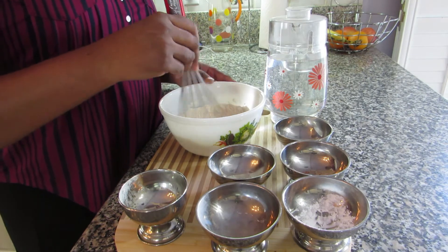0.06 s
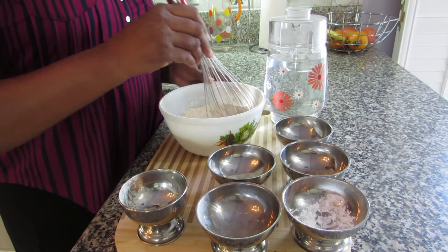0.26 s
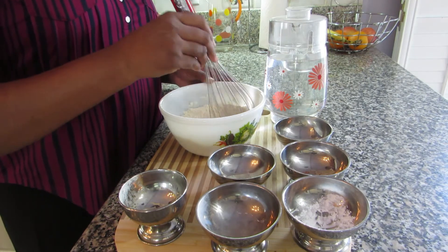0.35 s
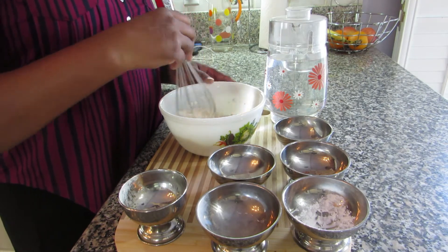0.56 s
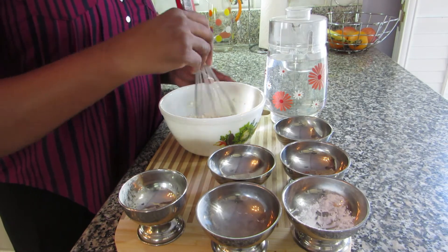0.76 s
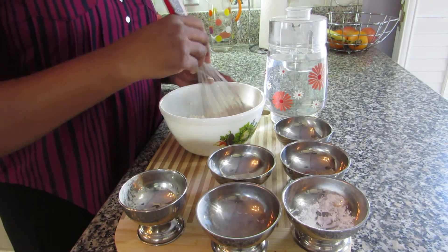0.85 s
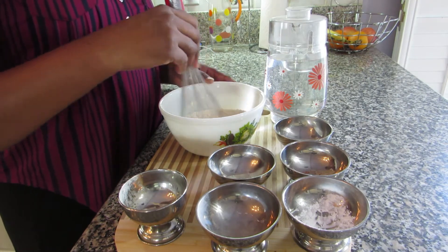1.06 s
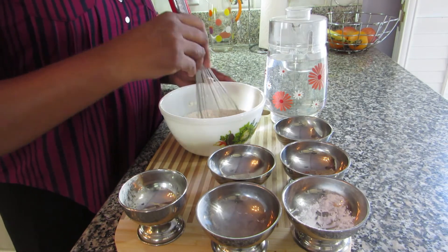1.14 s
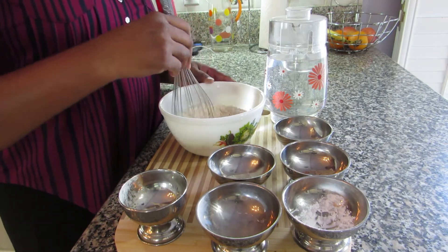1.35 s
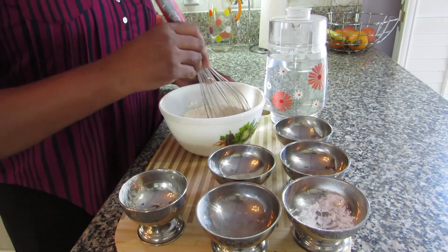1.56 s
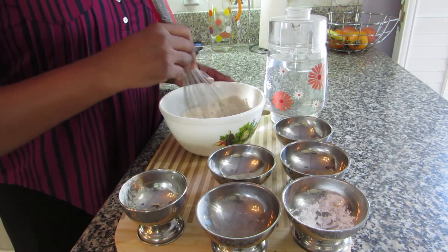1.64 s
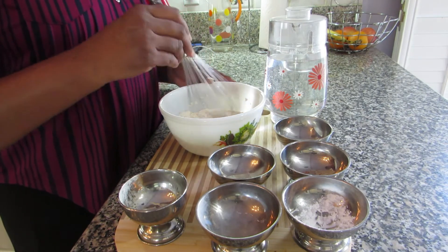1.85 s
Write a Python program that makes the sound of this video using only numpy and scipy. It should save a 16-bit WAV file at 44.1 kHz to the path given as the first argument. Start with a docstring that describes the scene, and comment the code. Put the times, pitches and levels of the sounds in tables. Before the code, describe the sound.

A wire whisk strikes a ceramic bowl with a bright clustered clink that rings briefly, then brushes through dry flour with light irregular ticks, close to a camera's stereo microphones in a hard-walled kitchen with low motor hum.

```python
"""Whisking flour in a ceramic bowl

A wire whisk stirs dry flour in a bowl on a wooden board, in a hard-walled kitchen, close to a camera's two
microphone ports. Wires clink on the bowl, which rings as decaying sines; short dull tones come from the board,
the counter and things nearby. The stroke through the flour is shaped noise with damped grains. A fridge-like
motor hums as steady sines over filtered room noise; decaying noise gives the walls' answer."""
import sys
import numpy as np
from scipy import signal
from scipy.fft import rfft, irfft, next_fast_len
from scipy.io import wavfile
from scipy.ndimage import map_coordinates

SR = 44100
rng = np.random.default_rng(int(sys.argv[2]) if len(sys.argv) > 2 else 0)


def int16_out(signal):
    """Quantize to a 16-bit WAV file."""
    q = np.round(np.clip(np.atleast_2d(signal).T, -1, 1) * 32767)
    wavfile.write(sys.argv[1], SR, q.astype(np.int16))


def magnitude_from_level(level_db):
    """Linear magnitude for a level in decibels (20 dB per decade)."""
    exponent = np.asarray(level_db, float) / 20
    return 10 ** exponent


N = 83790  # length in samples


def unit(x):
    """Scales a sound to rms 1."""
    return x / np.sqrt(np.mean(x ** 2) + 1e-20)


def along(points, hz):
    """Reads a curve of (Hz, value) points on a log frequency axis."""
    f, v = np.transpose(points)
    return np.interp(np.log(hz + 1), np.log(f + 1), v)


def wobble(rate):
    """A smooth random curve with rate knots a second."""
    knots = rng.standard_normal(int(N * rate / SR) + 4)
    return map_coordinates(knots, [np.arange(N) * rate / SR])


def filtered(x, response):
    """Multiplies the spectrum of x by a response of frequency in Hz."""
    m = next_fast_len(x.shape[-1] + 8192)
    spectrum = rfft(x, m) * response(np.fft.rfftfreq(m, 1 / SR))
    return irfft(spectrum, m)[..., :x.shape[-1]]


def ring(hz, db, t60, t, attack_s):
    """One mode: a sine that swells in quickly and dies by 60 dB in t60 seconds."""
    rise = 1 - np.exp(-t / attack_s)
    return magnitude_from_level(db - 60 * t / t60) * np.sin(2 * np.pi * hz * t) * rise


def add(track, s, sound):
    """Lays a sound into the track at s seconds."""
    track[round(s * SR):][:len(sound)] += sound


LINGER_DB, LINGER_LONGER = -21.5, 2.34  # weaker decay: level in dB, t60 as a multiple


def bell(hz, db, t60, t, attack_s):
    """A low bowl mode: a quick decay over a weaker part that the flour damps less, so it rings on."""
    quick = ring(hz, db, t60, t, attack_s)
    return quick + ring(hz, db + LINGER_DB, t60 * LINGER_LONGER, t, attack_s)


# Wires meeting the bowl close to the microphones. Each row: start in seconds, relative crack level in dB,
# then relative ring level in dB of each of the three lowest bowl modes, which depends on the spot struck.
CLINKS = [(0.237, -24.5, -28.5, -35, -36), (.243, -15, -18.5, -29, -33), (0.2459, -14.5, -34, -48, -53),
          (0.2507, -19.5, -40, -52, -42), (.256, -17.5, -46, -50, -60), (0.2647, -24, -58, -58, -54),
          (0.384, -41, -38, -44, -49), (0.495, -41, -44, -55, -58), (0.5713, -42, -46, -51, -51.5),
          (.626, -60, -60, -65, -66), (0.768, -43, -67, -55, -66), (0.837, -36, -51.5, -51, -58),
          (0.8432, -43, -62, -66, -63), (0.868, -34, -55, -67, -52), (0.878, -46, -65, -66, -65),
          (0.887, -35.5, -65, -70, -66), (.8926, -33.5, -67, -71, -64), (0.905, -57, -51.5, -62, -62),
          (0.9448, -38, -64, -73, -62), (.958, -44, -60, -66, -67), (1.0, -41, -64, -67, -62),
          (1.051, -41, -32.5, -59, -65), (1.072, -53, -67, -51, -67), (1.183, -51, -59, -63, -69),
          (1.256, -44, -65, -71, -73), (1.293, -34, -45, -67, -53), (1.306, -35, -68, -72, -64),
          (1.3918, -39, -56, -46, -55), (1.4024, -33, -45.5, -55, -38.5), (1.4125, -34.5, -46, -53, -44.5),
          (1.422, -40.5, -62, -51, -60), (1.5565, -36, -60, -42.5, -55), (1.5983, -29, -38, -44, -66),
          (1.6048, -31.5, -48, -60, -71), (1.8974, -23.5, -44, -42, -40)]
# The bowl's three main low modes, each a close pair.
# Each row: centre in Hz, split of the pair in Hz, t60 of the quick decay in seconds.
BOWL_LOW = [(1610, 4.8, .34), (2960, 14, .2), (4608, 3.5, .24)]
# Further bowl and wire modes, some close beside the low ones, all beating pairs.
# Each row: centre in Hz, level in dB relative to the contact, t60 in seconds.
BOWL_FURTHER = [(2196, -35, 0.07), (2880, -26.5, 0.33), (2987, -27.5, 0.23), (3580, -51, 0.087),
                (4560, -24, 0.16), (4730, -33, 0.22), (5270, -24, 0.083), (5825, -16.5, 0.085),
                (6578, -13, 0.08), (7327, -39, 0.055), (9030, -16, 0.14), (9300, -14.5, .1),
                (9670, -27.5, 0.054), (11400, -23.5, 0.14), (12000, -19, 0.043), (14185, -31, 0.11)]
# Colour of the crack. Each row: frequency in Hz, relative density in dB per Hz.
CRACK = [(250, -28), (480, -5.5), (1000, -12), (1670, -3.5), (2240, -9.5), (4600, -6.5), (6670, -11),
         (8600, -5), (11000, -21), (15500, -23)]
RING_PEAK_DB, MODE_SCATTER_DB, CRACK_DB = 4, 5, -3.5  # added to low modes, random spread, added to cracks
HARD_BLOW_DB, BRIGHTER = -16, .4  # softer contacts lose this many extra dB of further modes per dB
RING_RISE_S, FURTHER_SPLIT_HZ = .012, 30
CRACK_T60_S, CRACK_RISE_S = .025, .0004


def clinks():
    """Each contact cracks and rings the bowl anew; returns the low modes and the rest apart."""
    out, t = np.zeros((2, N + SR)), np.arange(SR * 2 // 3) / SR
    chance = rng.standard_normal((len(CLINKS), len(BOWL_FURTHER)))
    noise = rng.standard_normal((len(CLINKS), len(t)))
    cracks = filtered(noise, lambda hz: magnitude_from_level(along(CRACK, hz)))
    beat = np.cos(np.pi * FURTHER_SPLIT_HZ * t)
    crack_rise = 1 - np.exp(-t / CRACK_RISE_S)
    for (s, db, *low_db), scatter, crack in zip(CLINKS, chance, cracks):
        low = sum(bell(hz + side * split / 2, level + RING_PEAK_DB, t60, t, RING_RISE_S)
                  for (hz, split, t60), level in zip(BOWL_LOW, low_db) for side in (-1, 1)) / 2
        further_db = db + BRIGHTER * (db - HARD_BLOW_DB)
        further = beat * sum(ring(hz, further_db + level + MODE_SCATTER_DB * u, t60, t, 0.003)
                             for (hz, level, t60), u in zip(BOWL_FURTHER, scatter))
        burst = unit(crack) * magnitude_from_level(db + CRACK_DB - 60 * t / CRACK_T60_S) * crack_rise
        add(out[0], s, low)
        add(out[1], s, further + burst)
    return out[:, :N]


# Wires dragging through flour. Each row: time in seconds, relative level in dB.
STIR = [(.3, -44), (.36, -46.5), (.48, -56), (.74, -62), (.775, -56.5), (.82, -62), (.845, -51.5),
        (.9, -57.5), (.96, -55.5), (1.0, -60.5), (1.045, -55.5), (1.06, -49), (1.14, -63), (1.25, -61.5),
        (1.305, -54.5), (1.37, -59.5), (1.416, -52), (1.465, -56), (1.52, -57), (1.58, -58), (1.61, -48.5),
        (1.66, -57), (1.78, -63), (1.89, -62)]
# Colour of the flour's hiss. Each row: frequency in Hz, relative density in dB per Hz.
FLOUR = [(290, -36), (500, -2.5), (1470, -6), (1620, 5), (1770, -9), (3950, -13.5), (4760, -11),
         (13200, -22), (15500, -75)]
STIR_START_DB, STIR_DB = -60.5, 3  # relative level up to 0.23 s, dB added to the whole stroke
GRAIN_DB, DRAG_RING_DB = -5, -17  # grains against the hiss, and gain of the dragged bowl


def stirring():
    """Hiss and grains follow the stroke; noise of the drag keeps the bowl's low modes faintly ringing."""
    s, db = np.transpose([(0, STIR_START_DB), (.23, STIR_START_DB)] + list(STIR))
    stroke_db = np.interp(np.arange(N) / SR, s, db) + STIR_DB
    stroke = magnitude_from_level(stroke_db + 1.6 * wobble(29.8))
    hiss = unit(filtered(rng.standard_normal(N), lambda hz: magnitude_from_level(along(FLOUR, hz))))
    t = np.arange(SR // 2) / SR
    bowl = sum(ring(hz, 0, t60, t, 0.0013) for hz, _, t60 in BOWL_LOW)
    drag = signal.fftconvolve(stroke * rng.standard_normal(N), bowl / np.linalg.norm(bowl))[:N]
    return stroke * (hiss + magnitude_from_level(GRAIN_DB) * grains()) + magnitude_from_level(DRAG_RING_DB) * drag


GRAIN_HZ, GRAIN_OCTAVES, GRAIN_CYCLES = 5500, 1.1, 16  # middle pitch, spread either way, decay in cycles
GRAINS_PER_S, GRAIN_SPREAD_DB = 450, 2.5


def grains():
    """Gritty specks crushed against the glaze: tiny damped tones of random pitch and size."""
    draw = rng.random((int(GRAINS_PER_S * N / SR), 3))  # time, pitch, size
    hz = np.clip(GRAIN_HZ * 2 ** (GRAIN_OCTAVES * (2 * draw[:, 1:2] - 1)), 500, 14000)
    size = magnitude_from_level(GRAIN_SPREAD_DB * np.minimum(-np.log(draw[:, 2:] + 1e-9), 3))
    k = np.arange(512)
    decay = np.exp(-3 * hz * k / SR / GRAIN_CYCLES)
    specks = size * np.sin(2 * np.pi * hz * k / SR) * decay
    places = (draw[:, :1] * N).astype(int) + k
    return unit(np.bincount(places.ravel(), specks.ravel(), minlength=N)[:N])


# Short dull tones of the board, the counter and things nearby, some from the bowl rocking.
# Each row: start in seconds, pitch in Hz, relative level in dB, t60 in seconds.
THUDS = [(0.245, 487, -34, .1), (.255, 166, -36, 0.17), (.262, 765, -36.5, 0.11), (.266, 634, -30.5, 0.17),
         (.275, 1066, -40, 0.22), (0.291, 117, -36, 0.17), (.35, 159, -39, .2), (.575, 885, -42, 0.17),
         (.905, 159, -37.5, 0.25), (1.06, 527, -38.5, 0.096), (1.065, 234, -39, 0.21),
         (1.35, 188.3, -40, 0.23), (1.401, 1052, -41.5, .12), (1.42, 607, -38, 0.072),
         (1.458, 150.7, -41, 0.27), (1.599, 156.3, -37.5, 0.31), (1.6, 310, -36, 0.087)]
THUD_ATTACK_S = 0.0029


def thuds():
    """Board, counter and things nearby sound short dull tones, each a single damped mode."""
    out, t = np.zeros(N + SR), np.arange(SR // 2) / SR
    for s, hz, db, t60 in THUDS:
        add(out, s, ring(hz, db, t60, t, THUD_ATTACK_S))
    return out[:N]


# The hard walls' answer. Each row: frequency in Hz, t60 in seconds.
KITCHEN = [(200, .45), (2000, .42), (6000, .4), (14000, .3)]
ROOM_DELAY_S = 0.002914


def kitchen(x):
    """The walls answer as two noise tails in which each frequency dies at its own speed."""
    hz, t, z = signal.stft(rng.standard_normal((2, SR // 2)), SR, nperseg=256)
    decay = magnitude_from_level(-60 * t / along(KITCHEN, hz)[:, None])
    tail = signal.istft(z * decay, SR, nperseg=256)[1]
    late = np.pad(x, (round(ROOM_DELAY_S * SR), 0))[None]
    return signal.fftconvolve(late, tail / np.linalg.norm(tail[0]), axes=1)[:, :N]


# Motor and mains lines in the kitchen. Each row: frequency in Hz, mean rms level in dB before the port balance.
HUM = [(48.6, -49.5), (60, -61.5), (97.5, -50.5), (120, -60.5), (146.5, -51), (195, -56.5), (258, -58.5),
       (296, -58), (360.5, -55)]
# Phase between the microphone ports. Each row: frequency in Hz, lead of the left in radians.
HUM_LAG = [(50, 0.66), (100, 1.27), (200, 1.15), (360, 1.16)]
HUM_WAVER_DB = 0.87


def hum():
    """Steady motor and mains lines waver slightly, each reaching the two ports with its own phase."""
    t = np.arange(N) / SR
    ports = np.array([[.5], [-.5]])
    out = np.zeros((2, N))
    for hz, db in HUM:
        level = np.sqrt(2) * magnitude_from_level(db + HUM_WAVER_DB * wobble(6.16))
        phase = 2 * np.pi * (hz * t + rng.random()) + ports * along(HUM_LAG, hz)
        out += level * np.sin(phase)
    return out


# Colour of the room and microphone noise. Each row: frequency in Hz, relative density in dB per Hz.
AIR = [(25, -35), (45, -18), (70, -28), (110, -14.5), (200, -7.5), (400, -7.5), (700, -14.5), (1500, -20),
       (3000, -25), (4000, -29), (7000, -30.5), (11600, -40.5), (15500, -46)]
# Likeness of that noise at the two ports. Each row: frequency in Hz, correlation from -1 to 1.
AIR_ALIKE = [(50, .6), (200, -0.16), (500, -0.35), (2000, -0.21), (10000, -0.14)]
AIR_DB = -44.5  # rms over both ports, before their balance


def air():
    """Room and microphone noise, mixed from mid and side so that the ports are alike in the bass only."""
    def colour(hz):
        turn = np.arccos(np.clip(along(AIR_ALIKE, hz), -1, 1)) / 2
        return magnitude_from_level(along(AIR, hz)) * [np.cos(turn), np.sin(turn)]
    mid, side = filtered(rng.standard_normal((2, N)), colour)
    return magnitude_from_level(AIR_DB) * unit(np.array([mid + side, mid - side]))


ROOM_DB, LEFT_OVER_RIGHT_DB = -4.5, -0.7
RING_TO_ROOM_DB = -7  # gain of the low modes' send to the room


def scene():
    """The bowl in its kitchen, over hum and air, at two ports of slightly unequal level."""
    rings, ticks = clinks()
    rest = ticks + thuds() + stirring()
    room = magnitude_from_level(ROOM_DB) * kitchen(rest + magnitude_from_level(RING_TO_ROOM_DB) * rings)
    balance = magnitude_from_level(np.array([[.5], [-.5]]) * LEFT_OVER_RIGHT_DB)
    return (rings + rest + room + hum() + air()) * balance


# Narrow dips of the camera's sound path. Each row: centre in Hz, width in Hz, depth from 0 to 1.
NOTCHES = [(3930, 204, 0.65), (8150, 130, 1)]
TOP_HZ, TOP_WIDTH_HZ = 14500, 120  # the camera's treble ends here


def camera_response(hz):
    """The sound path's gain: narrow dips below a steep treble limit."""
    dips = [1 - np.clip(depth, 0, 1) * np.exp(-((hz - centre) / width) ** 2)
            for centre, width, depth in NOTCHES]
    limit = 1 + np.exp(np.clip((hz - TOP_HZ) / TOP_WIDTH_HZ, -50, 50))
    return np.prod(dips, axis=0) / limit


def low_pass(x):
    """Removes everything above the highest recorded frequency."""
    return signal.sosfilt(signal.butter(12, 15610, fs=SR, output="sos"), x)


def record(dry):
    """The camera's sound path shapes the scene."""
    mix = filtered(dry, camera_response)
    return low_pass(mix)


dry = scene()
out = record(dry)
int16_out(out)
```